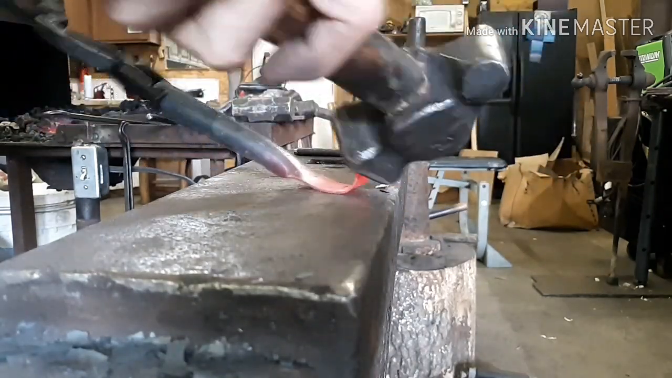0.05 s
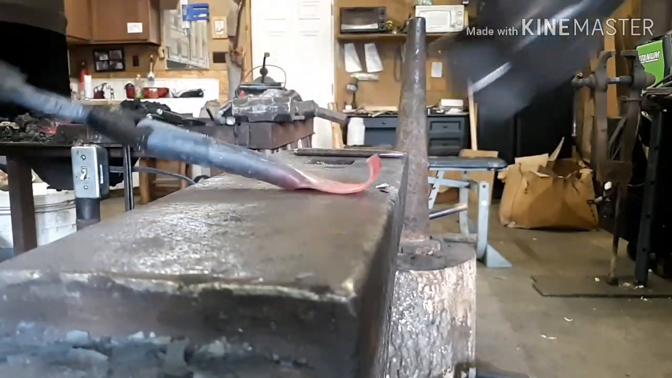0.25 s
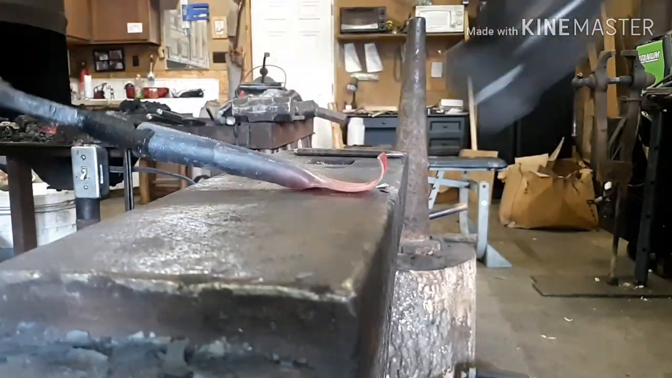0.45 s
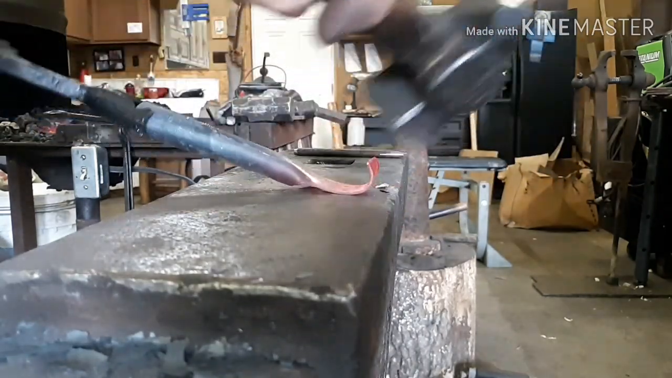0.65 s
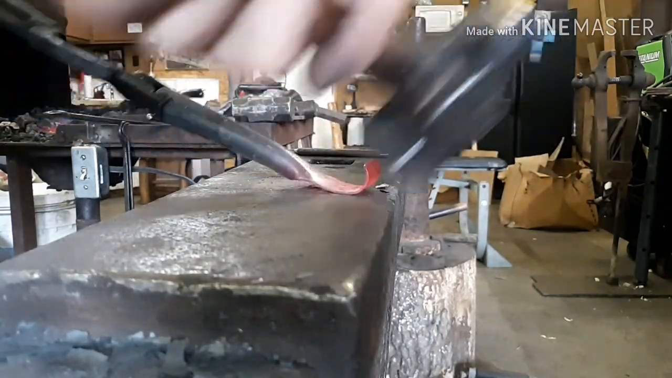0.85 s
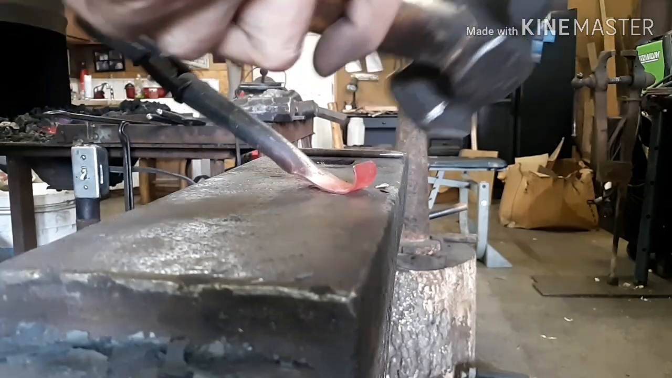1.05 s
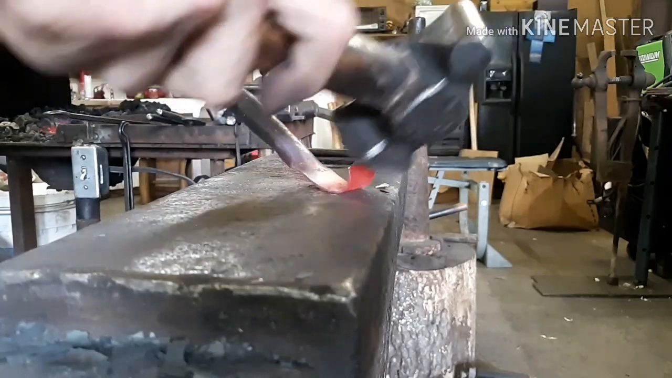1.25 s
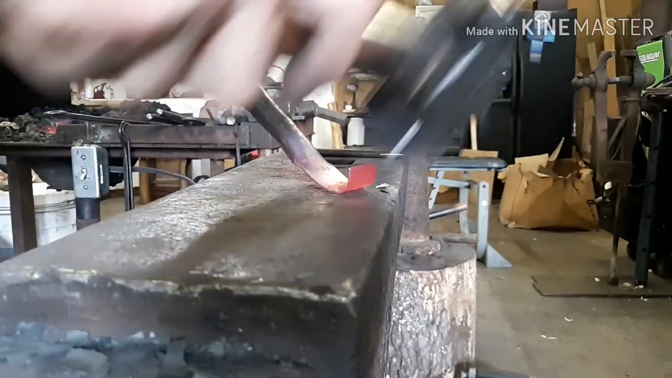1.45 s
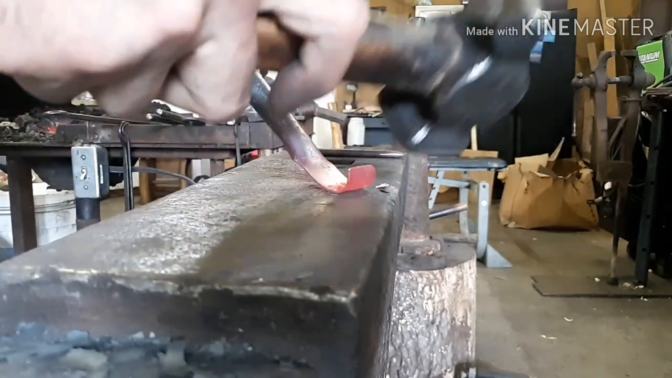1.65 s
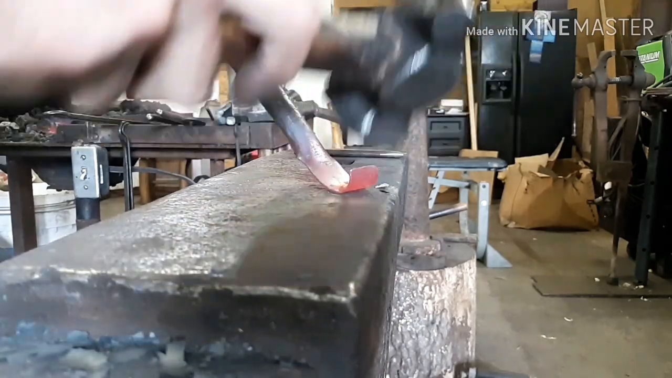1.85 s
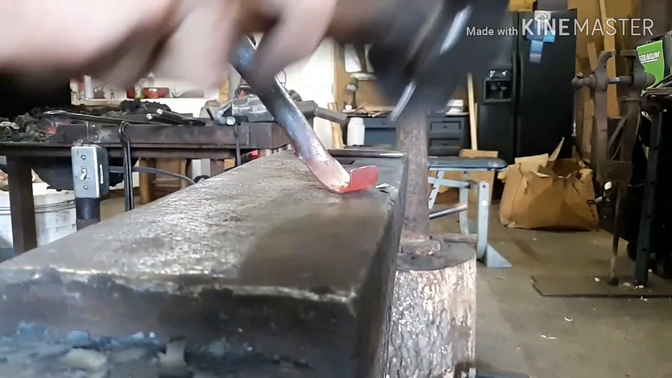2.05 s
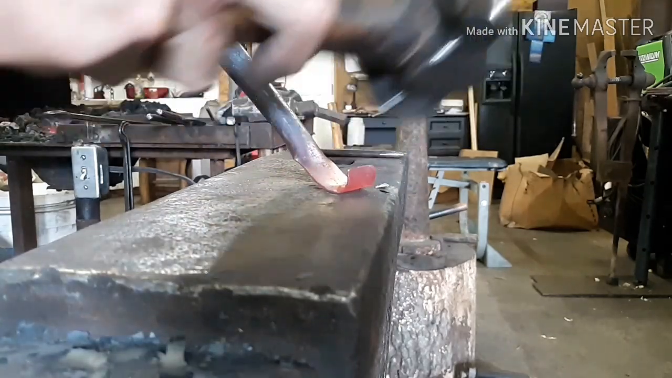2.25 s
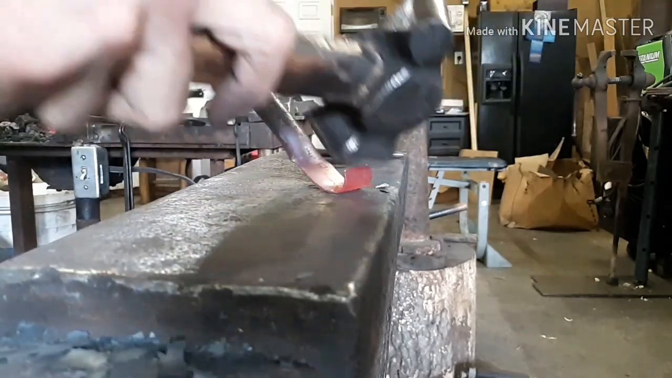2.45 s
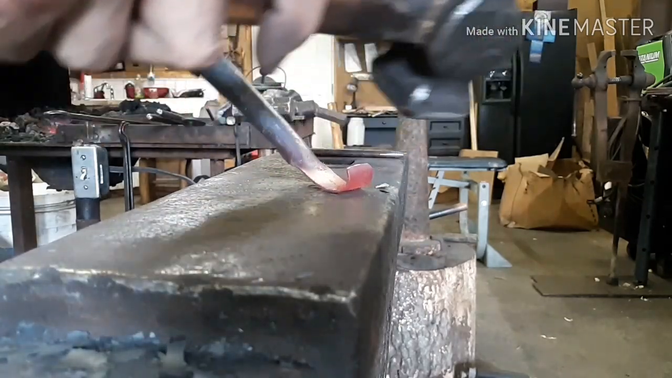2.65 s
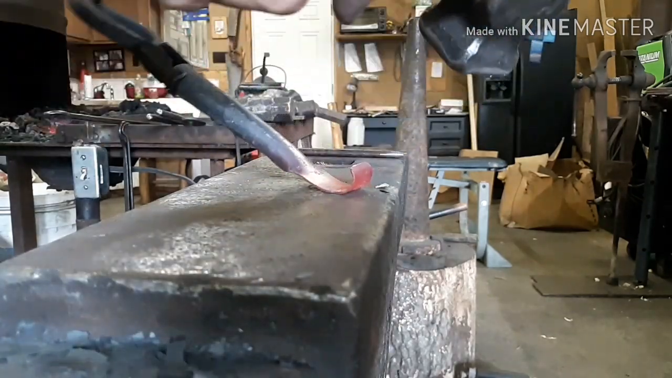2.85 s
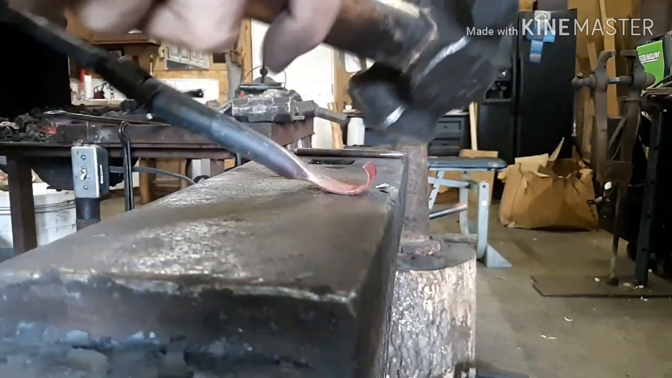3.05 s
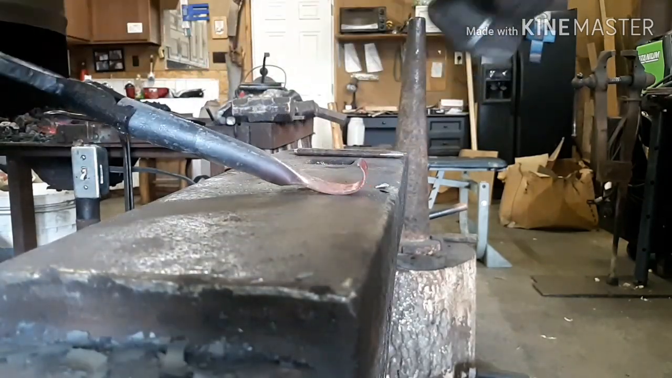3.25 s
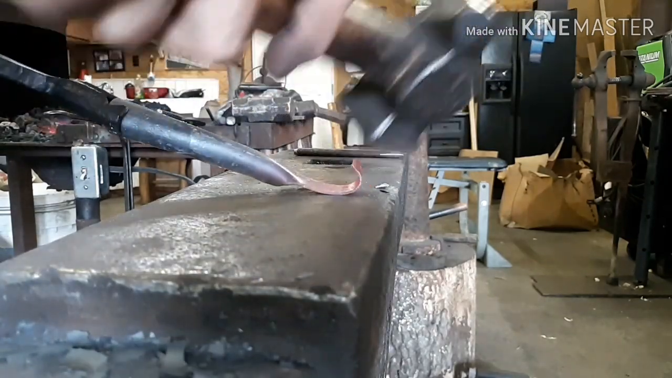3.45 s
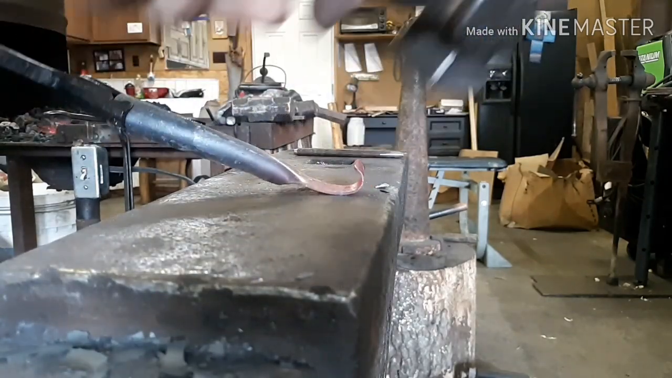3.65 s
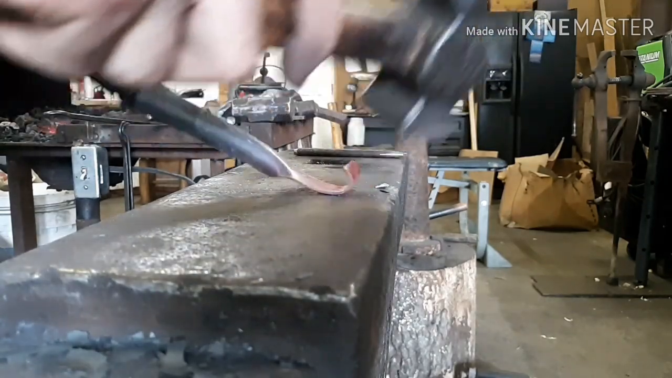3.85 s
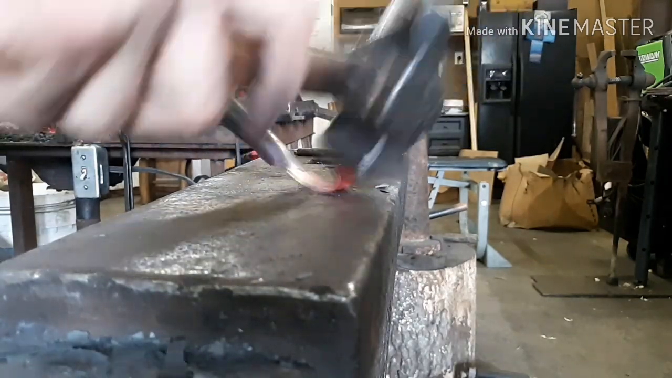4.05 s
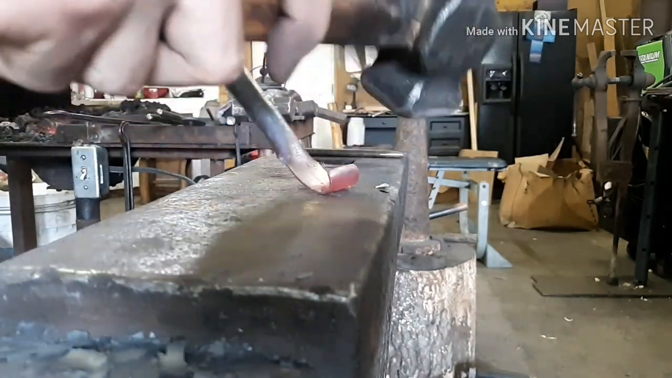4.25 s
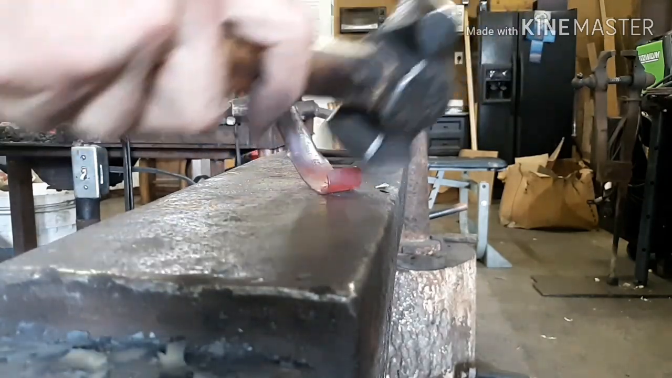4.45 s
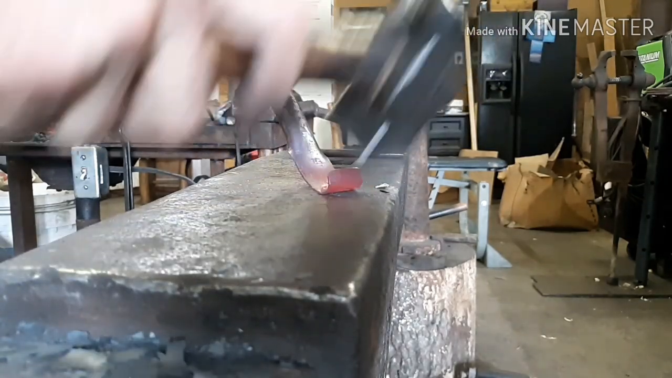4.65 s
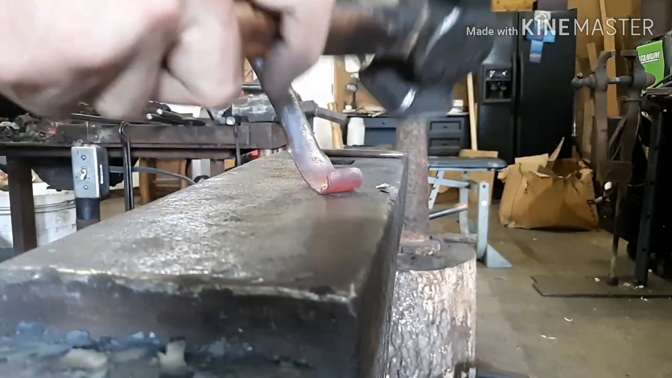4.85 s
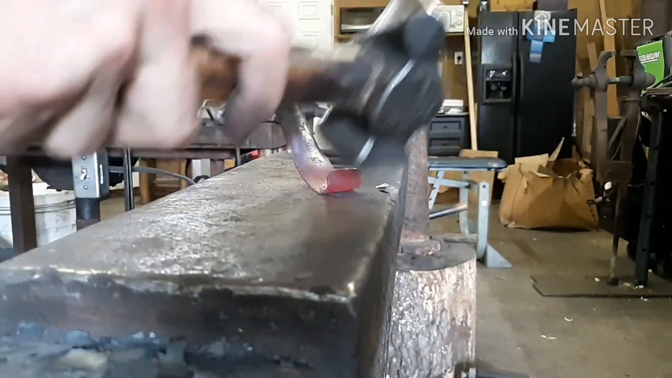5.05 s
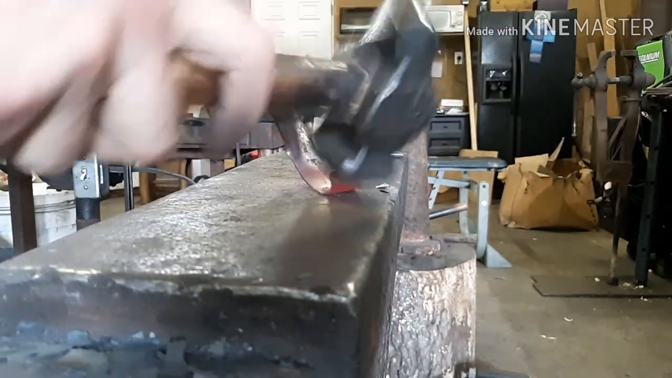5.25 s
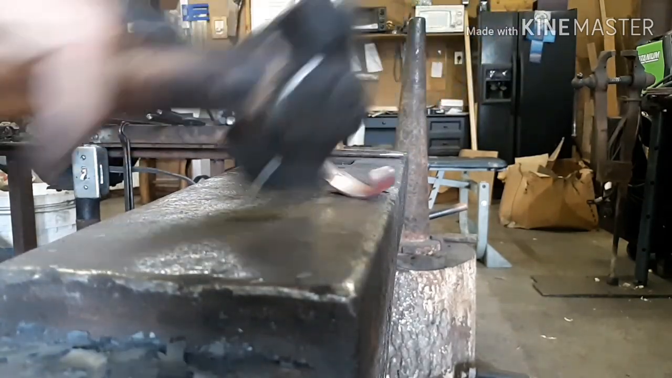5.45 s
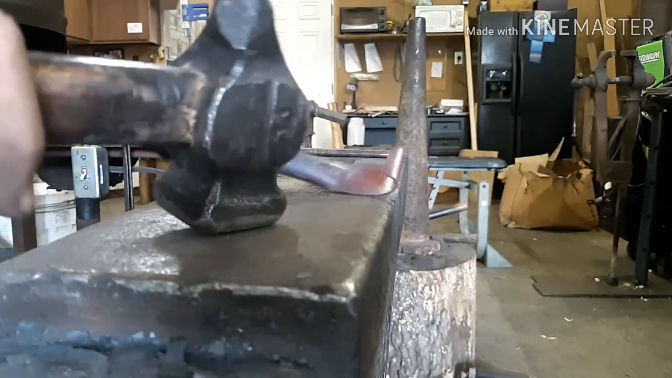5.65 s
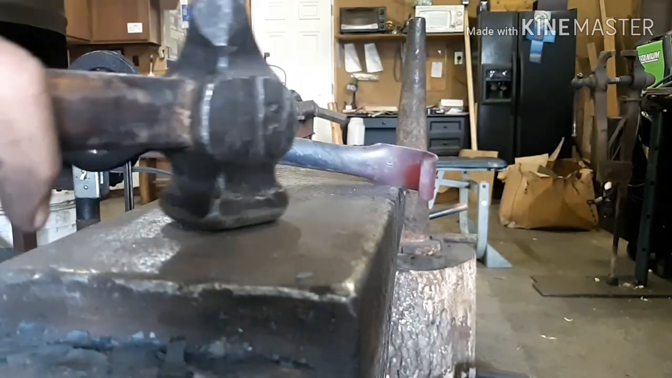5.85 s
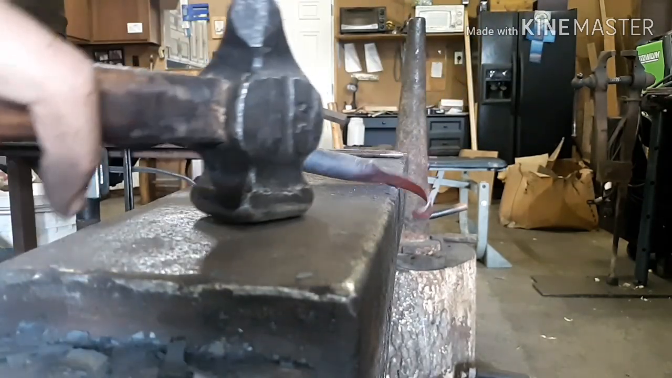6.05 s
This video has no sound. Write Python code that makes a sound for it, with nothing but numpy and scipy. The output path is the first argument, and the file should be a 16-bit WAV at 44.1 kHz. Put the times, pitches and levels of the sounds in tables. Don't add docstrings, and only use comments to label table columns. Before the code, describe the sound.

A hand hammer strikes a thin hot steel tip on an anvil in quick runs of sharp clanking blows, ending with a ringing drop and bounce.

```python
import sys
import numpy as np
from scipy import signal
from scipy.fft import rfft, irfft
from scipy.io import wavfile

SR = 44100
rng = np.random.default_rng(int(sys.argv[2]) if len(sys.argv) > 2 else 0)


def persist_wave(psi):
    counts = np.round(np.clip(psi, -1, 1) * 32767).astype(np.int16)
    wavfile.write(sys.argv[1], SR, np.atleast_2d(counts).T)


def invert_db(x):
    u = np.asarray(x, float) / 20
    return 10 ** u


N = 269010


def at_hz(points, hz):
    table_hz, value = np.transpose(points)
    return np.interp(np.log(hz), np.log(table_hz), value)


def rms_one(x):
    return x / np.sqrt(np.mean(x ** 2) + 1e-20)


def butterworth(x, order, hz, kind="low"):
    return signal.sosfilt(signal.butter(order, hz, kind, fs=SR, output="sos"), x)


def ring(clicks, hz, t60):
    r, w = invert_db(-60 / (t60 * SR)), 2 * np.pi * hz / SR
    return signal.lfilter([0, np.sin(w)], [1, -2 * r * np.cos(w), r * r], clicks + 1e-18)


def resonances(x, peaks):
    out = 0
    for hz, width_hz, db in peaks:
        r, w = np.exp(-np.pi * width_hz / SR), 2 * np.pi * hz / SR
        band = signal.lfilter([(1 - r * r) / 2, 0, (r * r - 1) / 2], [1, -2 * r * np.cos(w), r * r], x)
        out = out + invert_db(db) * band
    return out


def wavering(peaks, unlike):
    noise = rng.standard_normal((2, N))
    mid, side = signal.lfilter([.1], [1, -.9], resonances(noise, peaks))
    return rms_one(mid + unlike * side * np.array([[1], [-1]]))


# pitch_hz, width_hz, level_db
HUM_MODES = [(212.7, 25, 5.5), (328, 63, -6), (560, 230, -45)]
# pitch_hz, width_hz, level_db
DRONE_MODES = [(35.45, 20, -4.5), (59, 25, -1), (107, 16, 0.5)]
# frequency_hz, level_db (per Hz)
HISS_SPECTRUM = [(500, 1.5), (1500, -25), (2500, -8), (6000, -4.5), (8500, -12), (13000, -17.5),
                 (17000, -26.5)]
# start_s, level_db
HUM_LEVEL = [(0.0, -61), (0.45, -71.5), (0.95, -71.5), (1.56, -69), (2.07, -65.5), (2.29, -84.5),
             (2.95, -73.5), (3.75, -63), (4.15, -66), (5.08, -66), (5.72, -64), (5.91, -76.5), (6.1, -80)]
HISS_DB, DRONE_DB = -5.5, -7.5


def background():
    start_s, level_db = np.transpose(HUM_LEVEL)
    hum_db = np.interp(np.arange(N) / SR, start_s, level_db)
    hz = np.maximum(np.fft.rfftfreq(N, 1 / SR), 1)
    spectrum = rfft(rng.standard_normal((2, N))) * invert_db(at_hz(HISS_SPECTRUM, hz)) * (hz > 300)
    hiss = invert_db(hum_db + HISS_DB) * rms_one(irfft(spectrum, N))
    drone = invert_db(hum_db + DRONE_DB) * wavering(DRONE_MODES, unlike=.55)
    return invert_db(hum_db) * wavering(HUM_MODES, unlike=0.18) + drone + hiss


# frequency_hz, level_db (per Hz)
SHOP_SPECTRUM = [(50, -11), (100, -0.5), (180, -1.5), (300, 2), (700, -0.5), (1500, -1), (2500, 2.5),
                 (3500, 0), (4300, 7.5), (6300, 7), (8200, 4), (12000, 5.5), (16000, -13)]
# frequency_hz, t60_s
SHOP_DECAY = [(60, .6), (400, 0.47), (1100, 0.36), (3000, 0.41), (7000, 0.41), (15000, .3)]
# frequency_hz, coherence [0-1]
SHOP_COHERENCE = [(60, 1), (500, 1), (2000, 0), (16000, 0.36)]


def shop(x):
    t, edges = np.arange(SR) / SR, 40 * 2 ** np.arange(0, 9, 1 / 3)
    white, answer = rng.standard_normal((2, 2, SR)), 0
    for k, (low, high) in enumerate(zip(edges, edges[1:])):
        mid, side = butterworth(white[k % 2], 2, [low, high], "band")
        hz = np.sqrt(low * high)
        alike = np.clip(at_hz(SHOP_COHERENCE, hz), 0, 1)
        dying = invert_db(at_hz(SHOP_SPECTRUM, hz) - 60 * t / at_hz(SHOP_DECAY, hz))
        answer = answer + dying * (np.sqrt(1 + alike) * mid + np.sqrt(1 - alike) * side * [[1], [-1]])
    answer = answer * (1 - np.exp(-t / 0.002)) / np.sqrt(SR * 0.0092)
    return signal.fftconvolve(x[None], answer, axes=1)[:, :N]


# delay_s, left_db, right_db
EARLY_ECHOES = [
    (.0027, -18, -27),
    (.0075, -26.5, -14.5),
    (0.011, -15.5, -13),
]


def echoes(steel):
    out = 0
    for delay_s, left_db, right_db in EARLY_ECHOES:
        out = out + invert_db([[left_db], [right_db]]) * np.roll(steel, round(delay_s * SR), axis=1)
    return out


STROKE_DB = 25


def dragged(strokes, modes):
    t, level = np.arange(N) / SR, 0
    for peak_s, db, swell_s, fade_s in strokes:
        level = level + invert_db(db - STROKE_DB * np.maximum((peak_s - t) / swell_s, (t - peak_s) / fade_s))
    caught = rng.random(N) < 6000 / SR
    grit = caught * invert_db(2 * np.minimum(rng.exponential(1, N), 4)) * rng.choice([-1, 1], N)
    return level * rms_one(resonances(resonances(grit, modes), modes))


# peak_s, level_db, swell_s, fade_s
BAR_STROKES = [
    (2.83, -71, 0.028, 0.015),
    (3.002, -55, 0.075, 0.027),
    (3.096, -66.5, .03, 0.029),
    (3.15, -49, 0.0098, 0.011),
    (3.24, -67, .2, 0.13),
]
# pitch_hz, width_hz, level_db
BAR_GRIT_MODES = [(2800, 190, -7.5), (3450, 380, 4.4), (4760, 690, 5.5), (6020, 980, 2), (6850, 500, -1.5),
                  (10840, 3500, -5), (13300, 2500, -1)]
# peak_s, level_db, swell_s, fade_s
SLIDE_STROKES = [
    (5.756, -60.5, .15, 0.11),
    (5.828, -41.5, 0.066, 0.073),
]
# pitch_hz, width_hz, level_db
SLIDE_GRIT_MODES = [(4720, 650, 2), (2620, 150, -3.5), (3650, 1400, -2), (5930, 780, -3.5),
                    (11610, 2300, -5.5)]
# peak_s, level_db, swell_s, fade_s
RUMBLE_STROKES = [
    (5.7, -47.5, 0.089, 0.13),
    (6.03, -71, .35, .3),
]
# pitch_hz, width_hz, level_db
RUMBLE_BODY_MODES = [(550, 53, -1), (685, 180, -3.5)]
# start_s, level_db (peak)
SMALL_TICKS = [(5.752, -49.5), (2.8166, -54), (2.826, -53.5), (2.95, -48), (3.0924, -55), (3.1482, -55.5),
               (3.1734, -65), (3.324, -61), (3.6625, -46.5)]


def scrape():
    out = dragged(BAR_STROKES, BAR_GRIT_MODES)
    out += dragged(SLIDE_STROKES, SLIDE_GRIT_MODES) + dragged(RUMBLE_STROKES, RUMBLE_BODY_MODES)
    dying = np.exp(-np.arange(600) / SR / 0.0041)
    for start_s, db in SMALL_TICKS:
        burst = resonances(rng.standard_normal(600) * dying, BAR_GRIT_MODES)
        burst = resonances(burst, [(6040, 14000, 0)])
        out[round(start_s * SR):][:600] += invert_db(db) * burst / np.abs(burst).max()
    return out


MISS_S, DROP_S = 1.825, 5.527
LAID_LOW, STEEPEST_S = [.62, 2.1, 3.3], 1.75
FLAT_BLOWS, FLAT_DB = [.093, 3.429, 3.799, 5.019], 4
BOUNCE_SLAP_DB, BOUNCE_CRACK_DB, BOUNCE_THUD_DB = 2.5, -21, -19
THUD_DB, THUD_DB_PER_S, DROP_THUD_DB = -49, 9.5, -2.5
SQUARE_DB, SQUARE_SHARE = -11, 0.15
HEAD_RING_DB = (-13, 17.5, 2.5)
WALL_KNOCK_DB = (4, -2, -1.5)
BAR_DB, BARE_BAR_DB = -17.5, -4
CLANK_HZ, CLANK_HZ_PER_S = 5605, 430
BARE_CLANK_HZ, BOUNCE_CLANK_HZ = 4480, 6300
CLANK_PAN_DB, CLANK_PAN_DB_PER_S = 7, -3.5
CHATTER_MS, BARE_CHATTER_MS = 1.3, 0.43
# start_s, slap_db, dull_db (clank), crack_db (bright), anvil_db (ring)
HAMMER_BLOWS = [(0.0939, -8.5, -23.5, -22, -35.5), (0.58, -14.5, -24, -31.5, -48.5),
                (0.927, -17, -28, -31, -48), (1.2401, -22, -35, -37.5, -40.5),
                (1.5416, -15.5, -25, -36, -41), (1.826, -6.5, -8.5, -39, -9.5),
                (2.163, -26.5, -38.5, -45.5, -45.5), (2.4672, -20.5, -30, -37.5, -44.5),
                (3.429, -18, -27.5, -27.5, -46), (3.7985, -9, -21, -25, -38),
                (4.1145, -8.5, -20.5, -25, -34.5), (4.4173, -11, -20, -29.5, -35.5),
                (4.7275, -13.5, -20.5, -29.5, -38.5), (5.019, -8, -15, -22, -35),
                (5.3083, -15.5, -30, -24.5, -33), (5.5276, -7.5, -9, -31, -9)]
# start_s, knock_db, anvil_db (ring)
HAMMER_BOUNCES = [
    (5.5823, -21, -14),
    (5.616, -17, -12),
    (5.6409, -28, -30.5),
    (5.6595, -32, -54.5),
    (5.6699, -39.5, -57),
    (5.6828, -50, -28),
]


def contacts():
    s, knock_db, ring_db = np.transpose(HAMMER_BOUNCES)
    bounces = [s, knock_db + BOUNCE_SLAP_DB, knock_db, knock_db + BOUNCE_CRACK_DB, ring_db]
    s, slap_db, dull_db, crack_db, anvil_db = np.hstack([np.transpose(HAMMER_BLOWS), bounces])
    dropped, bounce = s > DROP_S - .01, s > DROP_S + .02
    bare = (np.abs(s - MISS_S) < .01) | dropped
    kind = bare.astype(int) + bounce
    laid_s = np.array(LAID_LOW)[np.maximum(np.searchsorted(LAID_LOW, s) - 1, 0)]
    tilted_s = np.clip(s - laid_s, 0, STEEPEST_S)
    hard_db = FLAT_DB * (np.abs(s[:, None] - FLAT_BLOWS).min(axis=1) < .01)
    square_db = np.where(bare, 0, SQUARE_SHARE * (crack_db - slap_db - SQUARE_DB))
    driven_db = THUD_DB + THUD_DB_PER_S * tilted_s + DROP_THUD_DB * dropped
    tip_hz = CLANK_HZ + CLANK_HZ_PER_S * tilted_s
    return dict(
        s=s, bare=bare, bounce=bounce, tilted_s=tilted_s,
        slap=slap_db, dull=dull_db, crack=crack_db, anvil=anvil_db,
        snap=slap_db + hard_db + square_db,
        thud=np.where(bounce, dull_db + BOUNCE_THUD_DB, driven_db),
        knock=anvil_db + np.array(WALL_KNOCK_DB)[kind],
        head=crack_db + np.array(HEAD_RING_DB)[kind],
        bar=np.where(bare, anvil_db + BARE_BAR_DB, crack_db + BAR_DB),
        pan=CLANK_PAN_DB + np.where(bounce, 0, CLANK_PAN_DB_PER_S * tilted_s),
        clank_hz=np.choose(kind, [tip_hz, BARE_CLANK_HZ, BOUNCE_CLANK_HZ]),
        chatter_ms=np.where(bare, BARE_CHATTER_MS, CHATTER_MS * invert_db(-2 * hard_db)))


def impulses(strengths):
    clicks = np.zeros(N)
    clicks[np.round(contacts()["s"] * SR).astype(int)] = strengths
    return clicks


def struck(modes, levels_db, spread_db):
    luck, out = rng.standard_normal((len(contacts()["s"]), len(modes))), 0
    for k, (hz, db, t60) in enumerate(modes):
        out = out + ring(impulses(invert_db(levels_db + db + spread_db * luck[:, k])), hz, t60)
    return out


def swelling(modes, levels_db, swell_t60):
    fast = [(hz, db, swell_t60) for hz, db, t60 in modes]
    return struck(modes, levels_db, spread_db=1.5) - struck(fast, levels_db, spread_db=1)


BODY_TOP_HZ = 7200
VOICE_GAINS_DB = (3.0, 28.1, 20.76, 16.23, 11)
WALL_THUD_DB, WALL_THUD_SHARE = -38.5, .6
# low_hz, high_hz
VOICE_BANDS = [(4200, 7300), (50, 700), (700, 2300), (2300, 4200), (7300, 15300)]


def radiated():
    hit, out = contacts(), 0
    thud_db = WALL_THUD_DB + WALL_THUD_SHARE * (hit["thud"] - THUD_DB)
    voices_db = hit["slap"], thud_db, hit["knock"], hit["dull"], hit["crack"]
    for band_hz, levels_db, gain_db in zip(VOICE_BANDS, voices_db, VOICE_GAINS_DB):
        out = out + butterworth(impulses(invert_db(levels_db + gain_db)) + 1e-18, 5, band_hz, "band")
    return out


JOLT_HZ, JOLT_DB, JOLT_T60_S = 87.7, -16, 0.027


def jolt():
    click = invert_db(JOLT_DB) * (np.arange(N) == round(DROP_S * SR))
    return ring(click, JOLT_HZ, JOLT_T60_S) * invert_db([[4], [-4]])


THUD_SPREAD_DB = 3
# pitch_hz, level_db, t60_s
STUMP_MODES = [(78, -15.5, 0.29), (139, -5, 0.37), (181.6, -3.5, 0.38), (250.5, 12, 0.053),
               (327, 10.5, 0.026), (449, -1.5, 0.18), (617, -2.5, .04)]


def stump_thud(thud_db):
    left = struck(STUMP_MODES, thud_db - 1.5, THUD_SPREAD_DB)
    right = struck(STUMP_MODES[::2], thud_db - 0.5, THUD_SPREAD_DB)
    right = right - struck(STUMP_MODES[1::2], thud_db - 23, THUD_SPREAD_DB)
    return np.array([left, right])


FREE_END_DB_PER_S = 14
# pitch_hz, level_db (beside the dull clank), t60_s, best_s (time of tilting)
FREE_END_NOTES = [(2545, -12, .022, .18), (3600, -11, .025, 1.4)]


def free_end():
    hit, out = contacts(), 0
    for hz, db, t60, best_s in FREE_END_NOTES:
        levels_db = hit["dull"] + db - FREE_END_DB_PER_S * np.abs(hit["tilted_s"] - best_s)
        out = out + ring(impulses(~hit["bare"] * invert_db(levels_db)), hz, t60)
    return out


# pitch_hz, level_db, t60_s
BAR_MODES = [(2530, 0, .03), (2590, -10, .08), (3550, -4, .018), (4650, -3, .025), (4940, -10, .03),
             (5330, -7, .018), (6300, -7, .015)]


def bar_ring(bar_db, bare):
    bar = struck(BAR_MODES, bar_db - 4 - 14 * bare, spread_db=3) + free_end()
    return butterworth(bar, 4, BODY_TOP_HZ)


REST_S = 5.75
# pitch_hz, level_db, t60_s
HEAD_MODES = [(11730, 0, .3), (12290, -9, .28)]


def head_ring(head_db, cushioned):
    free = swelling(HEAD_MODES, head_db - 2 - 9 * cushioned, swell_t60=.06)
    return free * invert_db(-400 * np.maximum(np.arange(N) / SR - REST_S, 0))


# pitch_hz, level_db, t60_s
ANVIL_MODES = [(1138, 1, .17), (1142, -30, .6), (1260, -11, .05), (1450, -8, .06), (1600, -7, .05),
               (1585, -28, .25), (1800, -14, .03), (2032, -10, .08), (2322, -11, .06), (2560, -11, .06),
               (2750, -13, .03), (3040, -13, .06), (3298, -7, .07), (3278, -30, .25), (3800, -19, .04),
               (4064, -20, .05), (4500, -5, .045), (5200, -21, .025), (6100, -18, .025), (4570, -21, .06),
               (5570, -24, .04), (600, -14, .05)]


def anvil_ring(anvil_db):
    return butterworth(swelling(ANVIL_MODES, anvil_db - 2, swell_t60=0.022), 4, BODY_TOP_HZ)


NEAR_DB = (3.5, -5, -0.4)
BOUNCE_TOP_HZ = 7500


def clanks(rise_s, unlike):
    out, t = np.zeros((2, N)), np.arange(1500) / SR
    hit = contacts()
    noise = rng.standard_normal((len(hit["s"]), 2, len(t)))
    near_db = np.transpose([hit["snap"], hit["dull"], hit["crack"]]) + NEAR_DB
    for i, s in enumerate(hit["s"]):
        slap_db, dull_db, crack_db = near_db[i]
        if hit["bounce"][i]:
            force = np.exp(-t / .00008) * np.ones((2, 1))
            dull_db, crack_db = dull_db + 14, crack_db - 45
        else:
            grit, other = noise[i]
            contact = np.exp(-t * 1000 / np.clip(hit["chatter_ms"][i], .3, 4)) * (1 - np.exp(-t / rise_s)) ** 2
            force = (grit + unlike * other * np.array([[1], [-1]])) * contact
        # level_db, peaks, skirt_hz
        parts = [(slap_db, [(hit["clank_hz"][i], 800, 0), (4700, 700, -12)], 1800),
                 (dull_db + 13, [(2780, 700, -7.5), (3160, 660, 6)], 2500),
                 (crack_db + 13.5, [(12400, 1500, -8), (9800, 4500, 1.5), (14600, 600, -8.0)], 8000)]
        sound = 0
        for db, peaks, skirt_hz in parts:
            part = resonances(resonances(force, peaks), [(peaks[0][0], skirt_hz, 0)])
            sound = sound + invert_db(db) * part / np.abs(part).max(axis=1, keepdims=True)
        if hit["bounce"][i]:
            sound = butterworth(sound, 4, BOUNCE_TOP_HZ)
        out[:, round(s * SR):][:, :len(t)] += invert_db(np.array([[.5], [-.5]]) * hit["pan"][i]) * sound
    out[0] = np.roll(out[0], -1)
    return out


def scene():
    hit = contacts()
    clank, drag = clanks(rise_s=0.00081, unlike=0.78), scrape()
    bar, anvil = bar_ring(hit["bar"], hit["bare"]), anvil_ring(hit["anvil"])
    head = head_ring(hit["head"], cushioned=~hit["bare"])
    steel = clank + (anvil + head) * invert_db([[3], [-3]])
    direct = steel + (bar + drag) * invert_db([[2], [-2]]) + stump_thud(hit["thud"])
    direct = direct + echoes(steel) + jolt()
    direct[0] = np.roll(direct[0], -5)
    overtones = anvil - 1.1 * resonances(anvil, [(ANVIL_MODES[0][0], 120, 0)])
    rings = invert_db(-9.5) * overtones + invert_db(-20.5) * head + invert_db(2.0) * bar + invert_db(-23.5) * drag
    return direct + shop(radiated() + rings) * invert_db([[1], [-1]]) + background()


def band_limit(x):
    return signal.sosfilt(signal.butter(12, 17170, fs=SR, output="sos"), x)


def record(dry):
    heard = dry - .5 * resonances(dry, [(8260, 2600, 0.0037)])
    heard = butterworth(heard, 2, 40, "high")
    heard = butterworth(.82 * np.tanh(heard / .82), 8, 15600)
    return band_limit(heard)


dry = scene()
out = record(dry)
persist_wave(out)
```